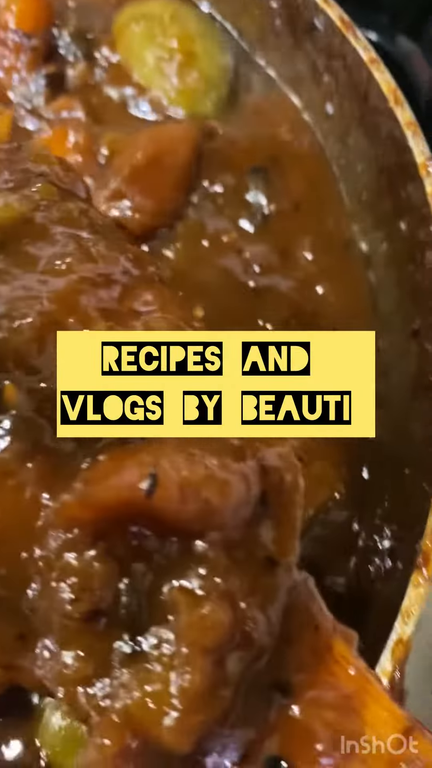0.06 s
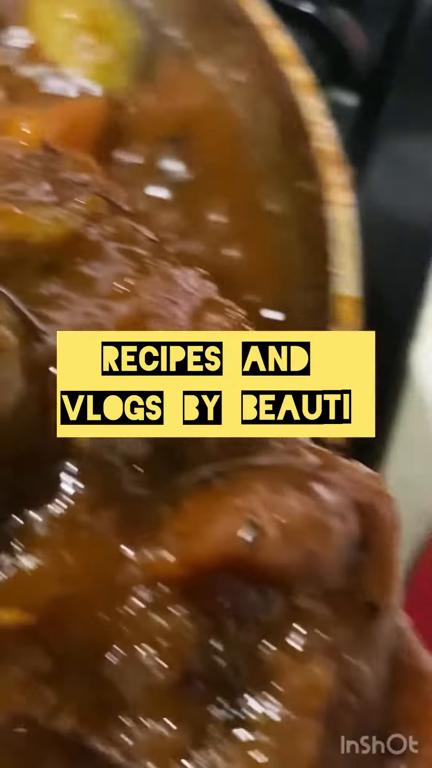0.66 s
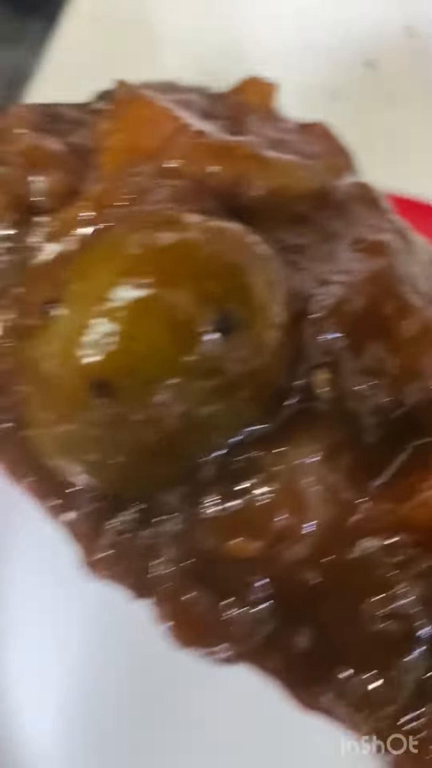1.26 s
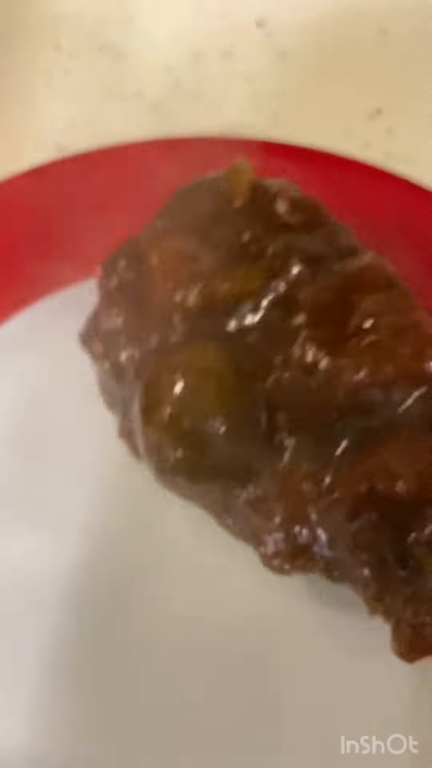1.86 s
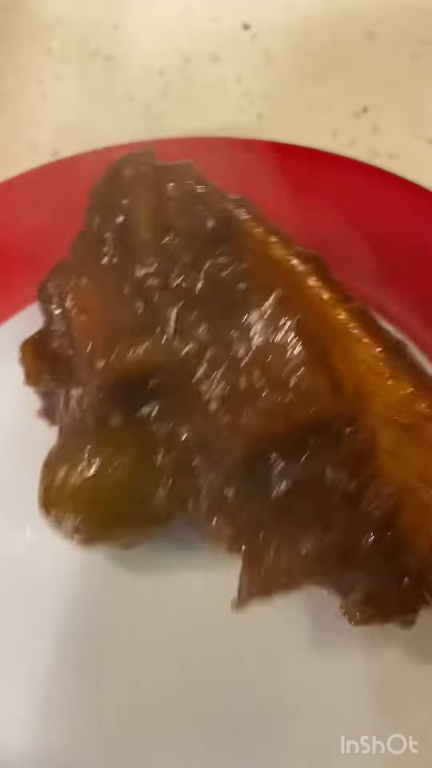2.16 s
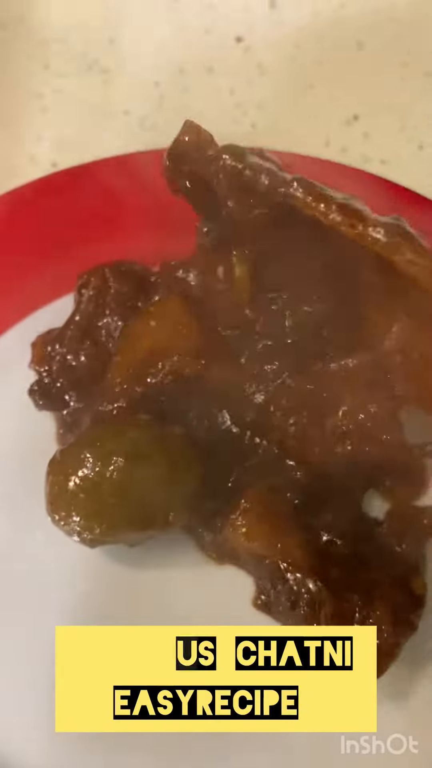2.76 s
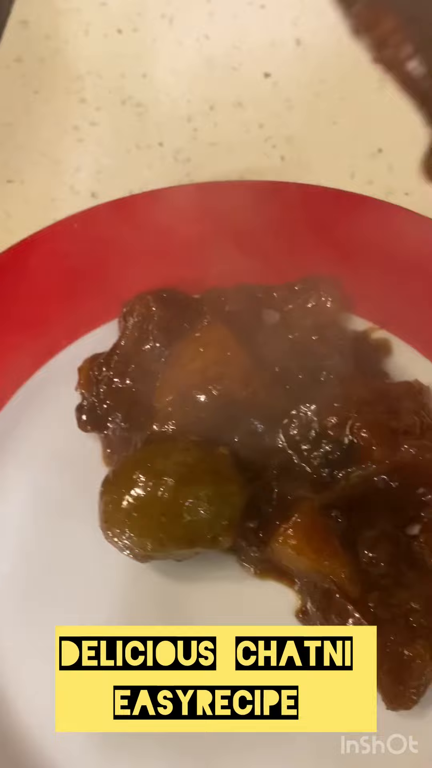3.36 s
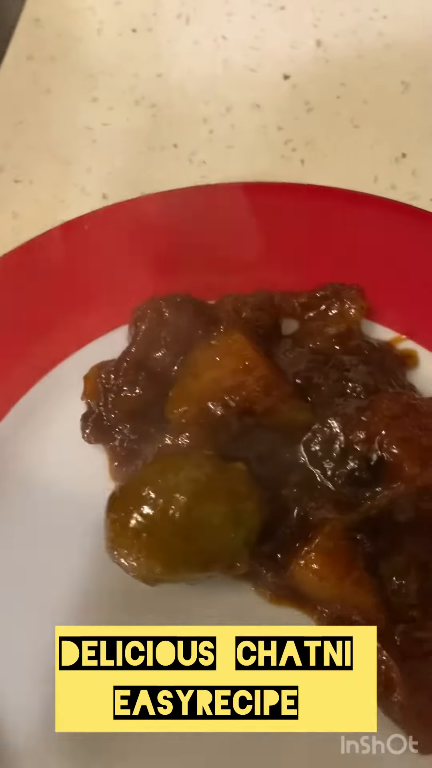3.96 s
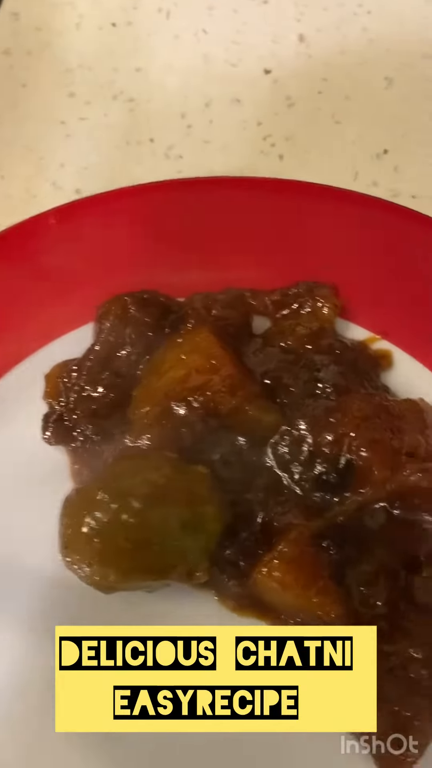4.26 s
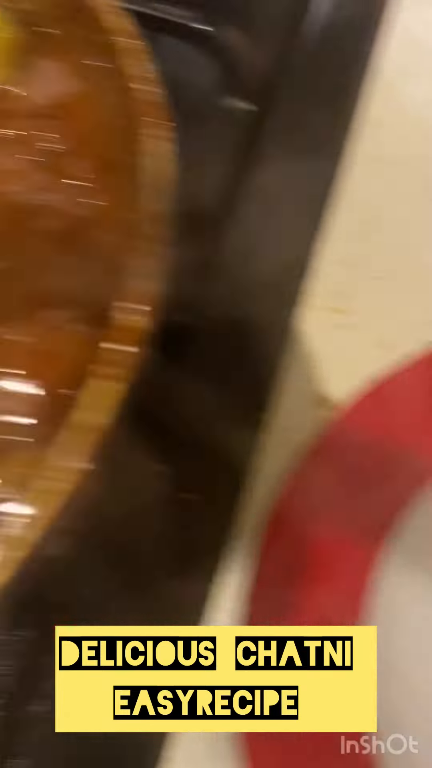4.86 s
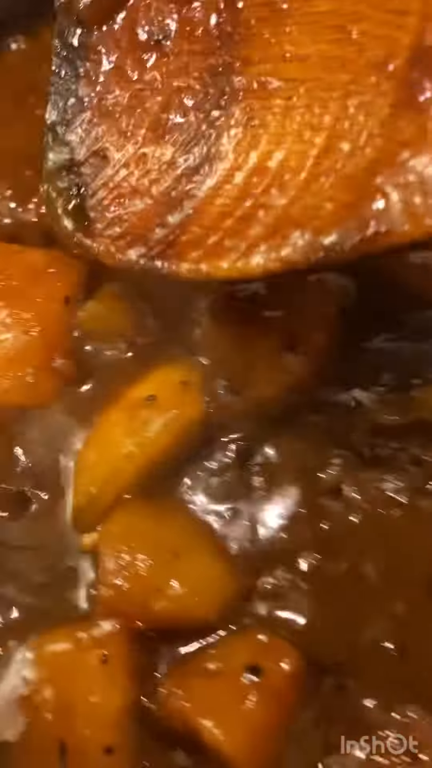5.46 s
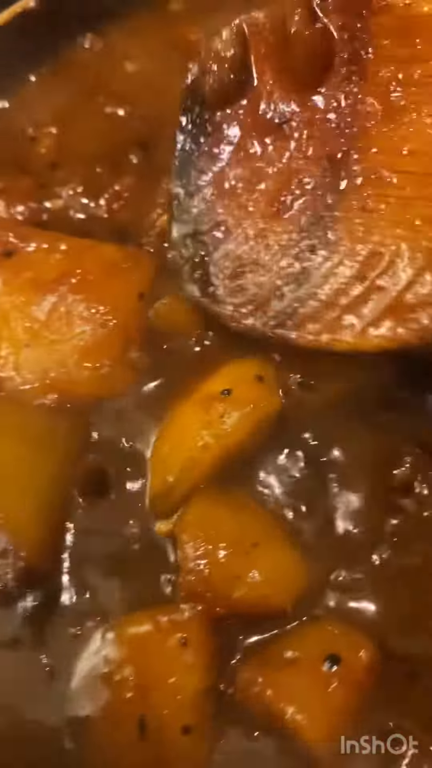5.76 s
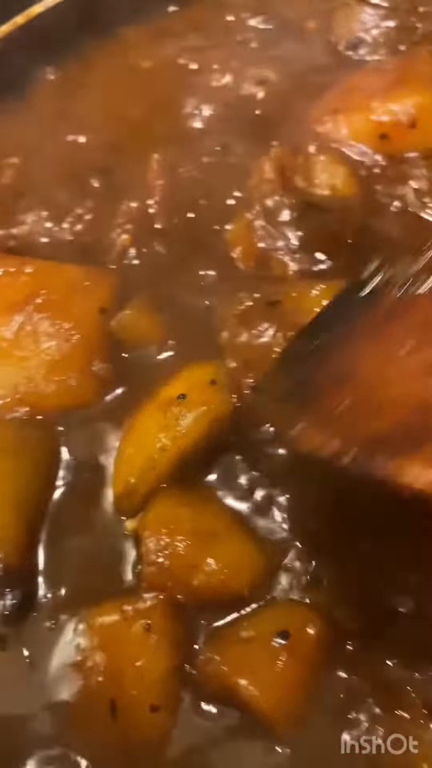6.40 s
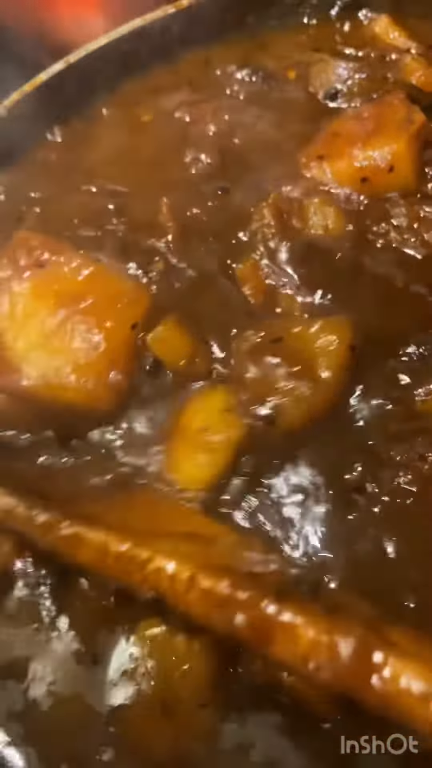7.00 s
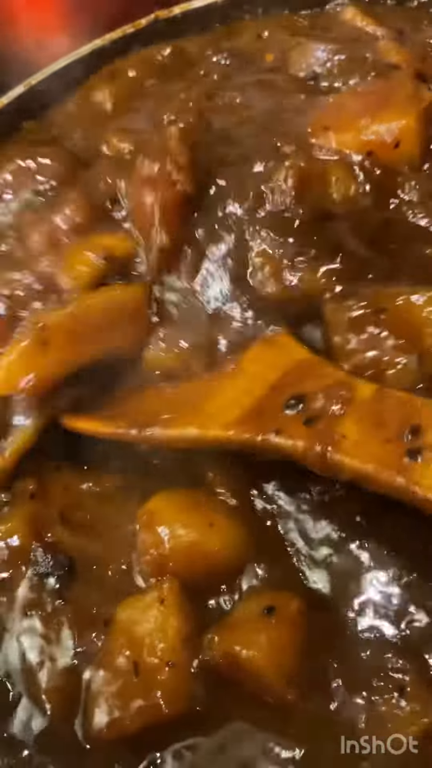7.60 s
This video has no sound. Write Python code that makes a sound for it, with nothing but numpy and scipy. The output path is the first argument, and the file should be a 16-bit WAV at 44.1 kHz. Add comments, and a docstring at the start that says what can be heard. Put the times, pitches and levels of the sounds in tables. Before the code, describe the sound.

Thick sauce simmers in a pan, heard close up in stereo. A soft, steady sizzle with fine crackling runs throughout, over a low rumble from the stove and kitchen. Right at the start a wooden spoon drags through the sauce with a low shudder and lifts with one short plop at about 0.2 seconds. From then until roughly 4.2 seconds bubbles break with irregular wet smacks, busiest between 1 and 2 seconds. Sharp, high spits are scattered all the way through, clustering between 3 and 4 seconds. Low glugs come near 0.5 and 1.2 seconds, then again between 4.2 and 5.8 seconds as the smacks thin out. From about 6.6 seconds the spoon stirs again, making a quick run of dull, low bumps and rubbing, louder than the simmer, until the end at around 7.6 seconds.

```python
"""Thick chutney simmers in a pan: tiny bursts at the hot metal sizzle over a low kitchen rumble.
At the start a wooden spoon drags through the sauce and lifts with a plop.
For about four seconds bubbles smack wetly, with a few low glugs and sharp spits.
Then the smacks thin out, leaving glugs and spits. Near seven seconds the spoon stirs with dull bumps.
A hand-held pair of microphones listens throughout."""
import sys
import numpy as np
from scipy import signal
from scipy.fft import rfft, irfft
from scipy.io import wavfile
from scipy.ndimage import uniform_filter1d

SR = 44100
rng = np.random.default_rng(int(sys.argv[2]) if len(sys.argv) > 2 else 0)


def file_out(sig):
    """Save sig as 16-bit WAV at sys.argv[1]."""
    # one column per channel
    cols = np.atleast_2d(sig).T
    # limit, then scale
    lim = np.clip(cols, -1, 1)
    pcm = np.round(lim * 32767).astype(np.int16)
    wavfile.write(sys.argv[1], SR, pcm)


N = 336791  # about 7.6 seconds


def amp(db):
    """Turns decibels into a number to multiply by."""
    return 10 ** (np.asarray(db) / 20)


def evened(x):
    """Scales a signal to an average strength (rms) of 1."""
    return x / np.sqrt(np.mean(x ** 2) + 1e-20)


def value_at(table, hz):
    """Reads between the rows of a frequency table, on a logarithmic scale."""
    row_hz, value = np.transpose(table)
    return np.interp(np.log(hz + 1), np.log(row_hz + 1), value)


def level(table, column=1):
    """Turns a table of times and dB levels into a gain for every sample."""
    rows = np.array(table)
    return amp(np.interp(np.arange(N) / SR, rows[:, 0], rows[:, column]))


def coloured(x, colour):
    """Shapes the lows and highs of x by a table, then evens its strength."""
    gain = amp(value_at(colour, np.fft.rfftfreq(N, 1 / SR)))
    return evened(irfft(rfft(x) * gain, N))


def add(mix, start_s, sound):
    """Adds a sound into the mix at the given time."""
    start = round(start_s * SR)
    part = mix[..., max(start, 0):start + sound.shape[-1]]
    part += sound[..., max(-start, 0):][..., :part.shape[-1]]


# The tone of the rumble's two parts. Each row: frequency in Hz, relative level in dB.
DEEP_COLOUR = [(15, -49), (28, -27), (45, -1.5), (70, -1), (110, -5), (170, -10.5), (300, -26), (600, -40)]
UPPER_COLOUR = [(70, -35), (140, -7), (200, 0), (300, 2), (400, -4.5), (550, -10.5), (1000, -38)]
# How the rumble rises and falls. Each row: time in seconds, deep and upper relative levels in dB.
RUMBLE_LEVELS = [(0, -54, -72), (0.18, -48, -46), (0.27, -44.5, -47.5), (0.6, -43, -51.5),
                 (0.75, -50.5, -54), (1.1, -53, -49.5), (1.36, -49.5, -48.5), (1.63, -54.5, -48),
                 (1.8, -44.5, -49), (2.3, -48, -49), (4.9, -45.5, -48), (5.3, -45.5, -48.5),
                 (5.7, -45, -47.5), (6.3, -45, -47), (7.64, -39.5, -50)]


def rumble():
    """The stove and kitchen make a low, unbroken noise."""
    deep = level(RUMBLE_LEVELS, column=1) * coloured(rng.standard_normal((2, N)), DEEP_COLOUR)
    upper = level(RUMBLE_LEVELS, column=2) * coloured(rng.standard_normal((2, N)), UPPER_COLOUR)
    return amp(0.6) * deep + amp(0.58) * upper


# The tone of the air in the pan. Each row: frequency in Hz, relative level in dB.
HOLLOW_COLOUR = [(400, -20), (750, -5), (1080, -14.5), (1400, -4.5), (2200, -28)]
# The hollow is loudest when heard from above the pan. Each row: time in seconds, relative level in dB.
HOLLOW_LEVELS = [(0, -10), (0.5, -16), (1.05, -34), (3.2, -18.5), (4.4, -12.5), (5.2, -9.5), (6.3, -11.5),
                 (7.64, -10.5)]


def pan_hollow(note_hz=1046, width_hz=49, note_db=-5):
    """The sizzle stirs the air in the pan: a hollow noise with one clear note."""
    broad, drive = rng.standard_normal((2, 2, N))
    note = evened(signal.lfilter(*signal.iirpeak(note_hz, note_hz / width_hz, SR), drive))
    return level(HOLLOW_LEVELS) * (coloured(broad, HOLLOW_COLOUR) + amp(note_db) * note)


def ring(hz, cycles):
    """A small pocket of air rings for a few cycles, rising in pitch as its skin opens."""
    age = np.arange(2048) * hz / SR  # counted in cycles
    envelope = (1 - np.exp(-age / 0.16)) * np.exp(-age / cycles)
    return envelope * np.sin(2 * np.pi * (age + 0.0093 * np.minimum(age, 8) ** 2))


def hiss(patchy_db, swell_db):
    """Steam noise flutters in small patches of pitch and swells over wide ones as the boil surges."""
    grid = (257, N // 128 + 5)  # pitch bands by time steps
    real, imaginary = rng.standard_normal((2, 2, *grid))
    fine, broad = rng.standard_normal((2, *grid))
    patches = evened(uniform_filter1d(uniform_filter1d(fine, size=12, axis=1), size=10, axis=0))
    swell = evened(uniform_filter1d(uniform_filter1d(broad, size=32, axis=1), size=70, axis=0))
    spectrum = (real + 1j * imaginary) * amp(patchy_db * patches + swell_db * swell)
    _, noise = signal.istft(spectrum, nperseg=512, noverlap=384)
    return evened(noise[:, :N])


def crackle(low_hz, high_hz, per_s, spread_db, cycles, pitches=24):
    """Countless tiny bubbles burst, each with a random pitch and size."""
    sizes = amp(spread_db * np.minimum(rng.exponential(1, (2, N)), 4.5))
    kicks = sizes * (rng.random((2, N)) < per_s / SR)
    kicks *= rng.choice([-1, 1], (2, N))
    pitch_index = rng.integers(0, pitches, (2, N))
    out = np.zeros((2, N))
    for k, hz in enumerate(np.linspace(low_hz, high_hz, pitches)):
        bubble = evened(ring(hz, cycles))
        out += signal.oaconvolve(kicks * (pitch_index == k), bubble[None], axes=1)[:, :N]
    return evened(out)


def surge(depth_db):
    """A quick flutter in loudness, as steam breaks out in spurts."""
    return amp(depth_db * evened(uniform_filter1d(rng.standard_normal(N), size=500)))


def echoes(x, echo_db, drift_s=0.000482, count=8):
    """Pan wall, stove and counter bounce the sound back; the delays drift as the microphones move."""
    n, out = np.arange(N), x.copy()
    for delay_s, sway_hz, offset in rng.uniform([.001, .08, 0], [.007, .3, 1], (count, 3)):
        sway = np.sin(2 * np.pi * (sway_hz * n / SR + offset))
        delayed = n - SR * (delay_s + drift_s * sway)
        out += amp(echo_db) * np.array([np.interp(delayed, n, row) for row in x])
    return out


# The tone of the sizzle's body and its high fizz. Each row: frequency in Hz, relative level in dB.
BODY_COLOUR = [(150, -14), (400, -2.5), (650, -.5), (1050, -.3), (1600, -1.4), (1850, -1.5), (2300, 1),
               (3000, -1.3), (4000, -2), (5200, -2.3), (6500, -5.8), (8000, -13), (12000, -35)]
FIZZ_COLOUR = [(3000, -25), (5000, -6), (6300, 2.0), (7600, 2.8), (9000, .5), (12400, .3), (13400, -.2),
               (14300, -2), (15800, -2.2)]
# How the whole sizzle rises and falls. Each row: time in seconds, relative level in dB.
SIZZLE_LEVELS = [(0.03, -45.5), (1.78, -45), (1.99, -46), (2.81, -47), (3.04, -47), (3.42, -46.5),
                 (3.76, -47), (4.1, -46.5), (4.29, -46.5), (5.28, -47), (5.89, -46.5), (7.6, -45.5)]


def sizzle(body_db=3, fizz_db=-1):
    """Steam hisses out of the sauce; the nearest bursts crackle and small bubbles simmer wetly."""
    grains = crackle(600, 8000, per_s=2600, spread_db=3.2, cycles=1.2)
    body = coloured(hiss(patchy_db=2, swell_db=0.52) + amp(-10) * grains, BODY_COLOUR)
    simmer = amp(-26) * crackle(1950, 2400, per_s=120, spread_db=1.7, cycles=9, pitches=8)
    fizz = hiss(patchy_db=3, swell_db=1.1)
    fizz += amp(-6.5) * crackle(7800, 12600, per_s=1600, spread_db=0.1, cycles=4.2)
    sound = amp(body_db) * (body + simmer + pan_hollow()) + amp(fizz_db) * coloured(fizz, FIZZ_COLOUR)
    return echoes(level(SIZZLE_LEVELS) * sound * surge(depth_db=0.45), echo_db=-24)


# Hollow swells of the simmer. Each row: start in seconds, length in seconds, level in dB, pitch in Hz.
SWELLS = [(1.026, 0.16, -50.5, 286), (1.129, 0.19, -48, 290), (3.201, 0.13, -51, 262),
          (3.681, 0.32, -54, 255), (4.358, 0.25, -54, 286), (5.077, 0.2, -47, 286), (5.252, 0.18, -55, 410),
          (5.921, 0.13, -47, 222)]


def swells(width_hz=75):
    """A low, hollow note rises out of the simmer and sinks back."""
    out, freqs = np.zeros((2, N)), np.fft.rfftfreq(16384, 1 / SR)
    for start_s, length_s, db, hz in SWELLS:
        noise = rng.standard_normal((2, 16384))
        band = 1 / (1 + ((freqs - hz) / width_hz) ** 4)
        note = irfft(rfft(noise) * band)[:, :round(length_s * SR)]
        add(out, start_s, amp(db) * evened(note * np.hanning(note.shape[1])))
    return out


def bursts(rows, gain_db, cycles, spatter_db, spatter_s, octaves, clump_db, droplets_per_s):
    """Each bubble's skin snaps and rings; clumps of tiny droplets trail off around the same pitch."""
    out, t, freqs = np.zeros((2, N)), np.arange(8192) / SR, np.fft.rfftfreq(8192, 1 / SR)
    envelope = np.exp(-t / spatter_s) * (1 - np.exp(-t / 0.00032))
    for start_s, db, hz, trail_db in rows:
        clumps = evened(uniform_filter1d(rng.standard_normal(len(t)), size=100))
        sizes = rng.standard_normal((2, len(t))) * amp(clump_db * clumps)
        droplets = sizes * (rng.random((2, len(t))) < droplets_per_s / SR)
        band = 1 / (1 + (np.log2((freqs + 1) / hz) / octaves) ** 2)
        sound = evened(irfft(rfft(droplets) * band)) * amp(spatter_db + trail_db) * envelope
        snap = ring(hz, cycles)
        add(sound[0], 0, snap / abs(snap).max())  # row 0 is what both microphones share
        add(out, start_s + .001, amp(db + gain_db) * sound)
    return out


# Large bubbles. Each row: start in seconds, relative level in dB, pitch in Hz, extra churning in dB.
GLUGS = [(0.437, -32, 276, -4), (0.486, -38.5, 400, 8), (0.608, -51, 190, 0), (1.215, -31, 297, -2),
         (4.247, -38, 275, -9), (4.452, -37, 269, -4), (4.651, -36, 240, -9), (5.242, -34, 328, -1),
         (5.445, -36, 205, -2), (5.577, -28, 318, 2.5), (5.754, -37, 560, -3)]


def glugs():
    """Large bubbles glug deep in the sauce and leave it churning."""
    return bursts(GLUGS, gain_db=-3.5, cycles=2.3, spatter_db=-10.5, spatter_s=0.039,
                  octaves=0.71, clump_db=-2, droplets_per_s=2700)


# Sharp spits. Each row: start in seconds, relative level in dB, pitch in Hz, extra spatter in dB.
SPITS = [(0.29, -31, 11000, -3), (0.436, -31, 4000, -8), (0.55, -32, 3620, -5), (1.54, -29.5, 3400, 3.5),
         (1.716, -27.5, 4100, 0), (2.396, -31, 3600, -8), (2.899, -27, 14500, -12),
         (3.032, -26.5, 10000, -11), (3.236, -32, 5300, -1), (3.254, -32, 4900, 1), (3.269, -26, 5070, -3),
         (3.296, -33, 5600, 2), (3.328, -31.5, 5300, -2), (3.365, -37, 5100, 2), (3.399, -38, 5400, 5),
         (3.43, -39, 5200, 4), (3.744, -34, 4800, -2), (3.787, -31, 4900, 0), (3.929, -28.5, 4080, -3),
         (3.931, -27, 5700, -4), (3.964, -27, 5270, -9), (4.063, -27, 5200, -2), (4.099, -31, 5600, 0),
         (4.14, -36, 3700, 6), (4.476, -31, 4400, -6), (4.618, -34, 4780, 0), (4.857, -31.5, 4970, -1),
         (5.127, -31.5, 4390, -9), (5.344, -33, 4550, -4), (5.571, -32, 4000, -3), (5.775, -25, 12800, -3),
         (5.805, -32, 3810, -3), (5.854, -31, 2920, -3), (6.014, -20, 12500, -13), (6.351, -33, 4100, -3),
         (6.373, -29, 13000, -6), (6.556, -31, 4760, -4), (6.688, -30, 12700, -5), (7.0545, -25, 4950, -7),
         (7.055, -29, 11000, -9), (7.073, -33, 5000, -2), (7.132, -28, 10900, -9), (7.206, -32, 9700, -11)]


def spits():
    """Droplets burst with a high snap and a short, dry spatter."""
    return bursts(SPITS, gain_db=0, cycles=3, spatter_db=-8.5, spatter_s=0.017,
                  octaves=0.54, clump_db=1, droplets_per_s=2200)


# Wet smacks. Each row: start in seconds, relative level in dB, pitch in Hz, extra spatter in dB.
SMACKS = [(0.289, -27, 776, -10), (0.347, -34.5, 1960, 4), (0.359, -33, 810, -17), (0.694, -28, 2300, -9),
          (0.804, -24, 1970, -1.5), (0.828, -32, 2000, 5), (0.948, -30, 2480, 2.5), (1.233, -25, 1980, 3),
          (1.237, -29, 1500, -6), (1.248, -25, 1910, -5), (1.266, -22.5, 1790, -9), (1.284, -28, 2600, -3),
          (1.362, -26, 2200, -5), (1.39, -36, 2180, -3), (1.514, -20.5, 2480, 2), (1.568, -29.5, 2400, 3),
          (1.599, -30, 2310, 4), (1.633, -23.5, 1820, -8), (1.675, -35, 2200, 4), (1.712, -24, 2080, 1.5),
          (1.744, -36, 2100, 0), (1.908, -26.5, 2550, 1.5), (2.163, -29.5, 2270, 0), (2.243, -31, 3320, 4),
          (2.332, -35, 2490, -2), (2.549, -28, 2140, -10), (2.584, -29, 2220, -5), (2.641, -30, 2400, -5),
          (2.684, -33, 2100, -7), (2.856, -36, 2090, -4), (2.883, -32, 1750, 0), (3.041, -32, 2250, -1),
          (3.075, -36, 2070, -1), (3.111, -38, 2190, -5), (3.235, -30, 2220, -1), (3.565, -29, 2150, -6),
          (3.626, -31.5, 1450, 4), (3.662, -28, 1310, -4), (3.768, -30.5, 2380, 4.5), (4.029, -32, 1750, 1),
          (4.066, -25.5, 2500, -4), (4.221, -30.5, 2140, 0), (7.416, -31, 1850, -6)]


def smacks():
    """Bubbles in the thick sauce break open with a wet smack."""
    return bursts(SMACKS, gain_db=-2, cycles=2.3, spatter_db=-12, spatter_s=0.034,
                  octaves=0.29, clump_db=0.5, droplets_per_s=3500)


# The tone of the dragging spoon. Each row: frequency in Hz, relative level in dB.
DRAG_COLOUR = [(20, -47), (52, 3), (80, 3), (150, -11.5), (250, -18), (500, -40), (4000, -80)]
# Strokes of the spoon. Each row: start in seconds, length in seconds, level in dB.
STROKES = [(0.0, 0.26, -37.5), (0.844, 0.13, -43.5), (6.64, 0.13, -38), (6.76, 0.14, -30),
           (7.015, 0.089, -36.5), (7.083, 0.21, -30.5), (7.35, 0.06, -41), (7.51, 0.11, -38.5)]


def spoon_strokes(fade_s=0.0077, apart_db=-16):
    """The spoon drags through the sauce with a low shudder, nearly alike on the left and right."""
    t, push = np.arange(N) / SR, np.zeros(N)
    for start_s, length_s, db in STROKES:
        from_edge_s = np.minimum(t - start_s, start_s + length_s - t)
        push += amp(db) * np.clip(from_edge_s / fade_s, 0, 1)
    shared, apart = push * coloured(rng.standard_normal((2, N)), DRAG_COLOUR)
    return shared + amp(apart_db) * np.array([apart, -apart])


# The tone of the spoon's dull rubbing. Each row: frequency in Hz, relative level in dB.
RUB_COLOUR = [(20, -23), (50, 1), (90, 5.5), (160, -3.5), (250, -6.5), (350, -16), (550, -20), (1200, -48),
              (5000, -75)]
# Bumps of the spoon. Each row: time of the peak in seconds, level in dB, pitch in Hz, fade in cycles.
BUMPS = [(0.008, -22.5, 101, 0.48), (0.113, -25.5, 62.4, 0.69), (6.769, -25, 105, 0.56),
         (6.789, -14.5, 138, 1), (6.811, -17, 91, 1.5), (6.845, -15.5, 111, 1.1), (6.871, -25, 202, 0.41),
         (6.885, -15, 116, 0.69), (6.901, -22, 80, .5), (6.924, -17.5, 122, 0.75), (6.96, -20, 72.5, .65),
         (7.097, -26.5, 105, 0.83), (7.13, -23.5, 82, 1.5), (7.179, -20, 155, 0.69),
         (7.193, -19.5, 139, 1.5), (7.219, -17, 116, 0.53), (7.263, -22.5, 153, 0.35),
         (7.286, -22.5, 80, 0.98), (7.324, -18, 125, 0.6), (7.337, -17, 104, 0.88), (7.365, -21, 150, 0.49),
         (7.397, -31, 212, 0.45), (7.472, -14.5, 91, 0.73), (7.627, -23.5, 102, 0.32)]


def spoon_bumps(rise_cycles=0.55, lag_cycles=0.13, sag=0.5, rub_db=-19, knock_db=-15):
    """Each soft blow is a brief knock, then a swing or two of sinking pitch, with rubbing around it."""
    thuds, pressure, t = np.zeros(N), np.zeros(N), np.arange(-4096, 4096) / SR
    for peak_s, db, hz, fade_cycles in BUMPS:
        age = np.arange(-2, 5, hz / SR)  # cycles from the peak
        swing = np.cos(2 * np.pi * (1 - np.exp(-sag * age)) / sag)
        width = np.where(age < lag_cycles, rise_cycles, fade_cycles)
        envelope = 1 / np.cosh((age - lag_cycles) / width) ** 1.4
        add(thuds, peak_s - 2 / hz, amp(db) * swing * envelope)
        add(thuds, peak_s - 0.716 / hz, amp(db + knock_db) * ring(hz=340, cycles=0.96))
        rub_s = 0.85 / hz  # quick blows rub briefly
        add(pressure, peak_s + t[0], amp(db) ** 2 * np.exp(-abs(t) / rub_s))
    rub_noise = coloured(rng.standard_normal((2, N)), RUB_COLOUR)
    shared, apart = amp(rub_db) * np.sqrt(pressure) * rub_noise
    return thuds + shared + amp(-1.5) * np.array([apart, -apart])


def spoon_plop(start_s=0.1961, gain_db=-17, start_hz=1650, end_hz=130, fall_s=0.002, rise_s=0.0046):
    """The spoon lifts and a pocket of air opens in the sauce: one short note that falls steeply."""
    out, t = np.zeros(N), np.arange(2048) / SR
    hz = end_hz + (start_hz - end_hz) * np.exp(-t / fall_s)
    age = t / rise_s
    envelope = 2 * age ** 1.74 / (1 + age ** 4.6)
    add(out, start_s, amp(gain_db) * envelope * np.sin(2 * np.pi * np.cumsum(hz) / SR))
    return out


# How far the left side runs ahead of the right. Each row: frequency in Hz, lead in radians.
LEFT_LEAD = [(280, 0), (700, .65), (1700, .1), (2800, 1.5), (3800, .55), (4500, 1.1), (5000, .15),
             (5700, .9), (6850, 2.95), (8100, 3.35), (9800, 6.1), (11500, 6.6), (12700, 9.2), (14300, 9.65),
             (15400, 12.2)]
# How alike the two sides sound. Each row: frequency in Hz, likeness from 0 to 1.
LIKENESS = [(100, 1), (300, 0.97), (650, 0.71), (1300, 0.59), (1800, 0.81), (2900, 0.53), (4000, 0.63),
            (4500, 0.67), (5300, 0.66), (6200, 0.92), (7100, 1), (15000, 1)]
# Which side is louder. Each row: frequency in Hz, left minus right in dB.
BALANCE = [(60, -.3), (200, -1.4), (380, -2.2), (700, -1.3), (1290, 1), (2400, -2.5), (4400, -.4),
           (6000, 0)]


def microphones(x):
    """Row 0 of x reaches both sides, the right one later; row 1 is scattered sound that parts them."""
    hz = np.fft.rfftfreq(N, 1 / SR)
    likeness = np.clip(value_at(LIKENESS, hz), 0, .995)
    shared = rfft(x[0]) * np.sqrt((1 + likeness) / 2)
    scattered = rfft(x[1]) * np.sqrt((1 - likeness) / 2)
    lean_left = amp(value_at(BALANCE, hz) / 2) * np.exp(1j * value_at(LEFT_LEAD, hz) / 2)
    return irfft(np.array([(shared + scattered) * lean_left, (shared - scattered) / lean_left]), N)


def scene():
    """Mixes kitchen, pan and spoon; the spoon's low sounds reach both sides nearly alike."""
    bubbles = smacks() + spits() + glugs()
    background = sizzle() + rumble() + swells()
    spoon = spoon_bumps() + spoon_strokes() + spoon_plop()
    return microphones(background + bubbles) + spoon


def record(dry, low_hz=28, high_hz=15800):
    """Trims away the very lowest and highest sounds."""
    low_cut = signal.butter(2, low_hz, "highpass", fs=SR, output="sos")
    high_cut = signal.firwin(511, high_hz, window=("kaiser", 9), fs=SR)
    return signal.oaconvolve(signal.sosfiltfilt(low_cut, dry), high_cut[None], "same")


dry = scene()
out = record(dry)
file_out(out)
```